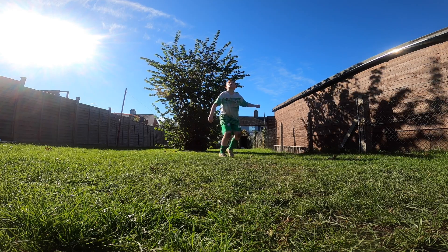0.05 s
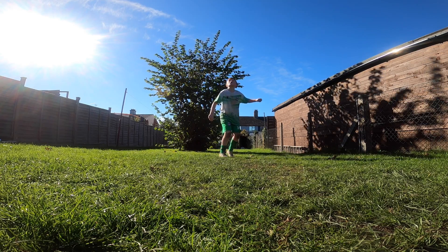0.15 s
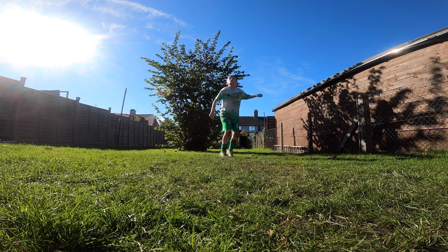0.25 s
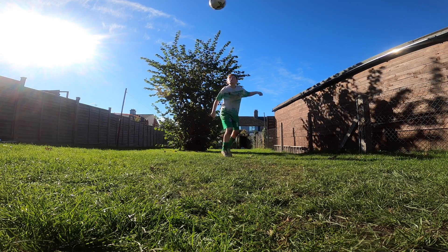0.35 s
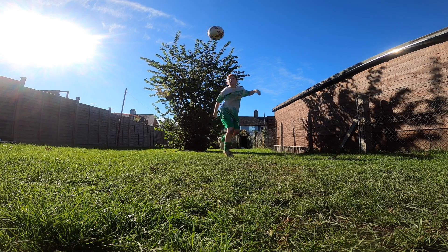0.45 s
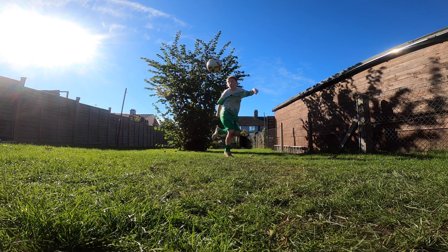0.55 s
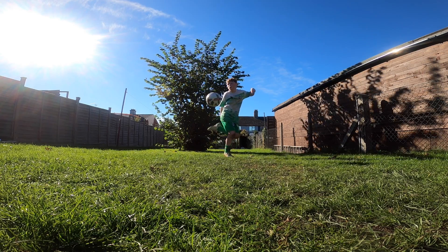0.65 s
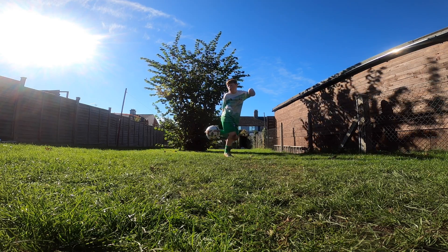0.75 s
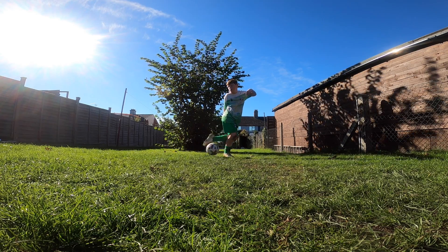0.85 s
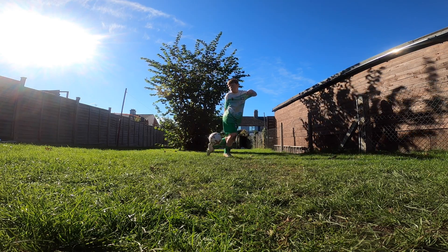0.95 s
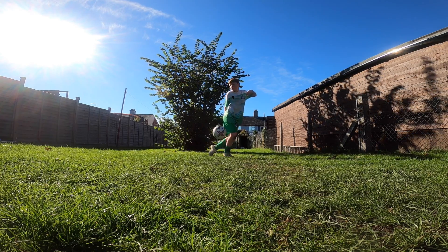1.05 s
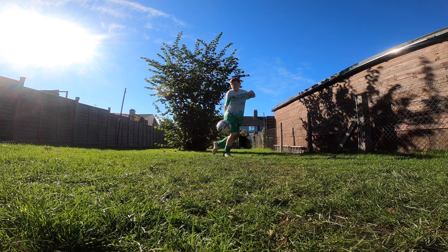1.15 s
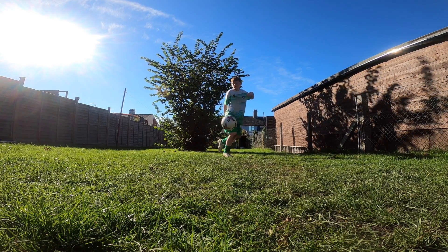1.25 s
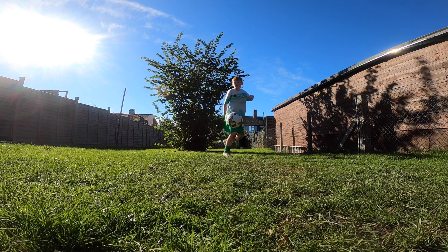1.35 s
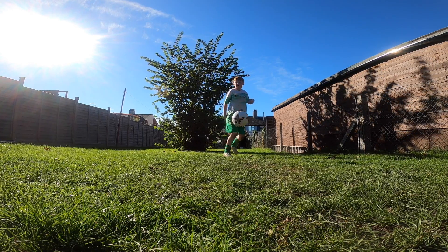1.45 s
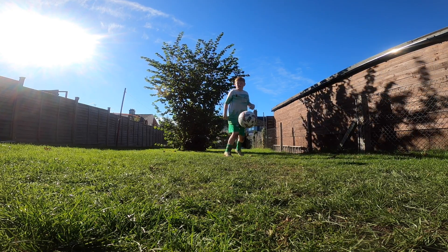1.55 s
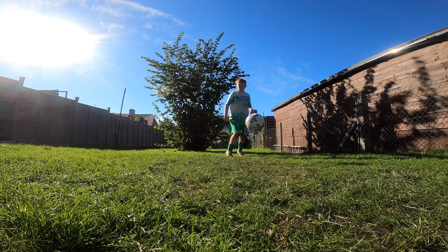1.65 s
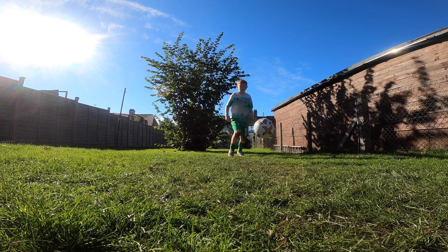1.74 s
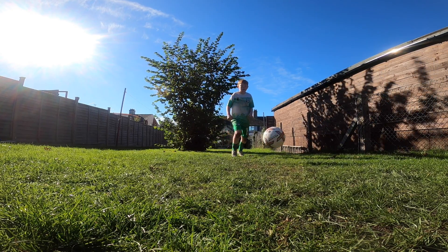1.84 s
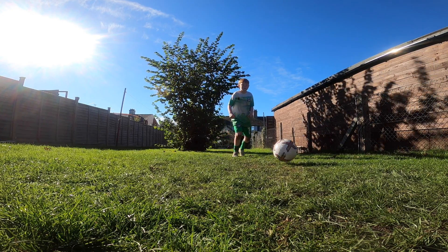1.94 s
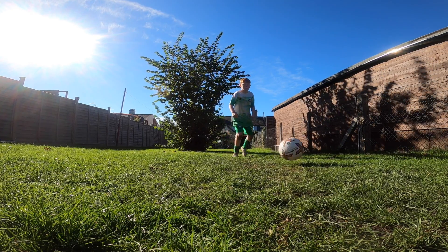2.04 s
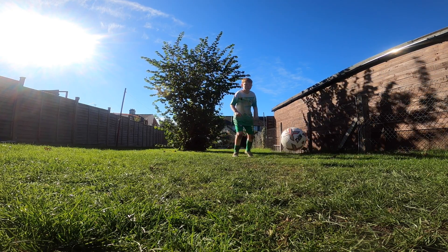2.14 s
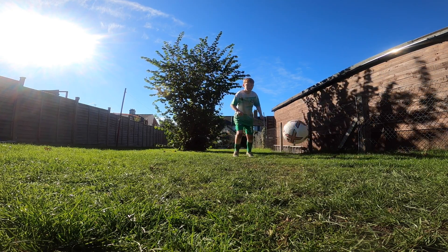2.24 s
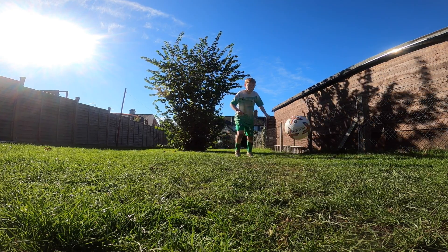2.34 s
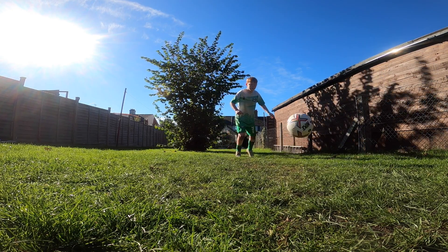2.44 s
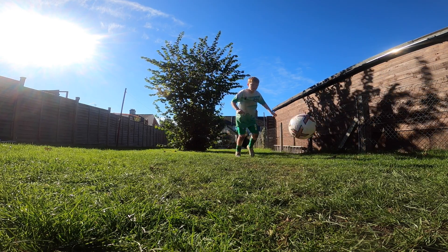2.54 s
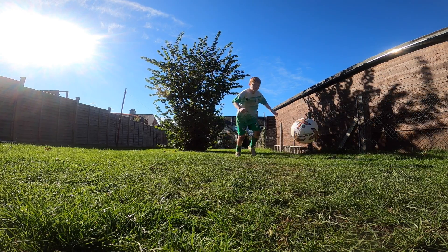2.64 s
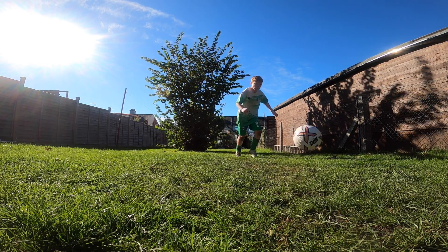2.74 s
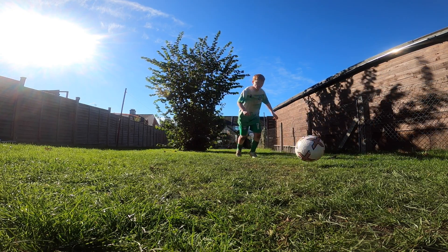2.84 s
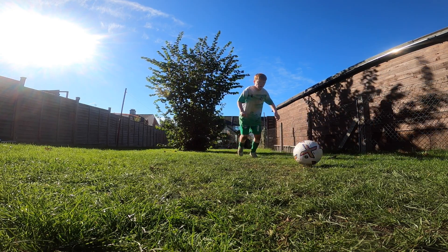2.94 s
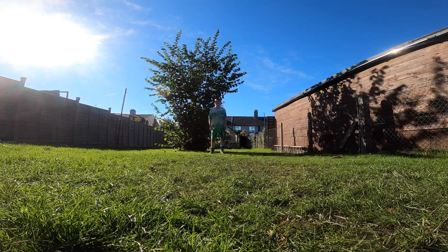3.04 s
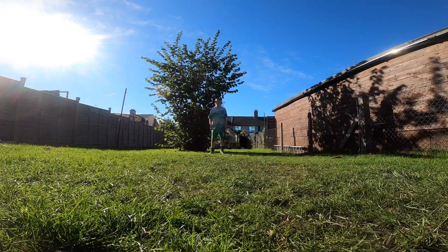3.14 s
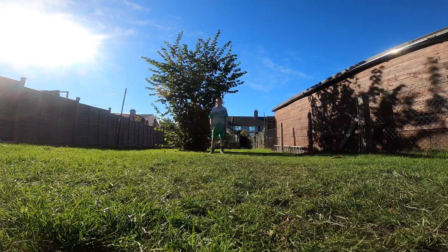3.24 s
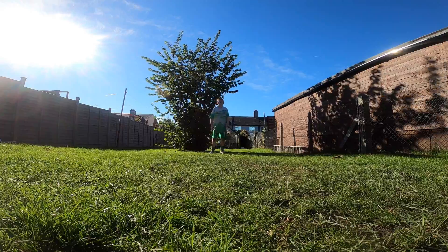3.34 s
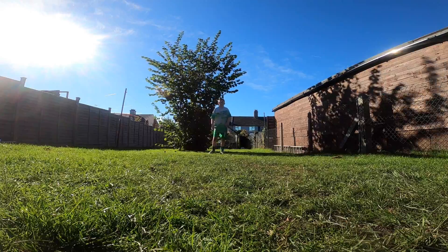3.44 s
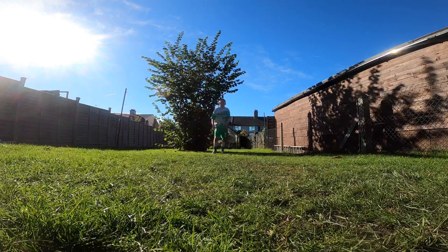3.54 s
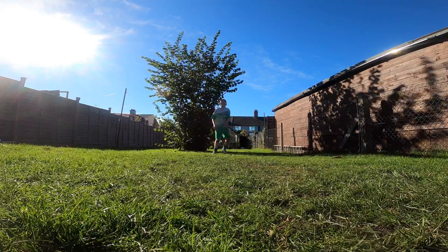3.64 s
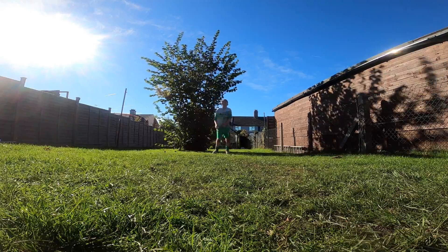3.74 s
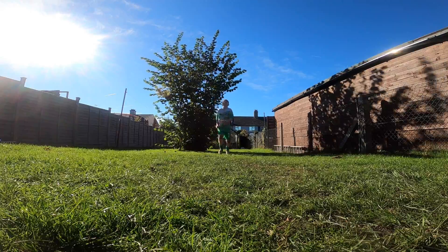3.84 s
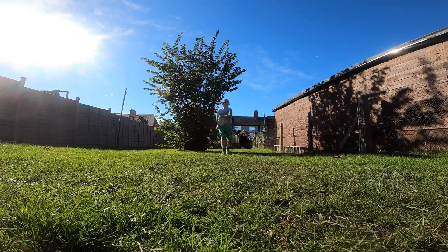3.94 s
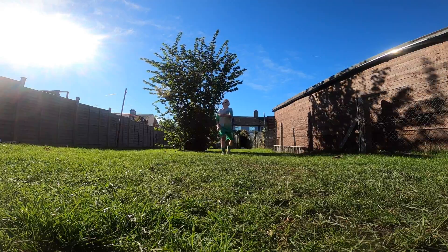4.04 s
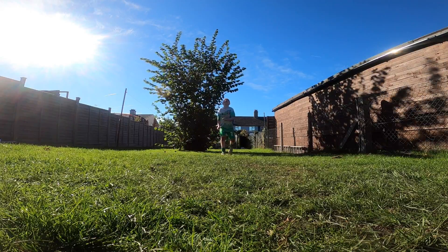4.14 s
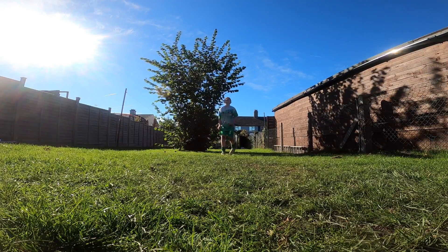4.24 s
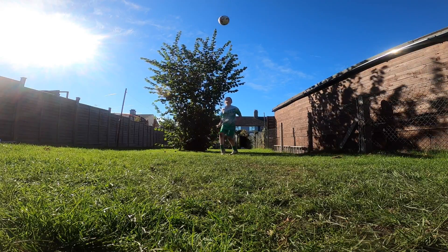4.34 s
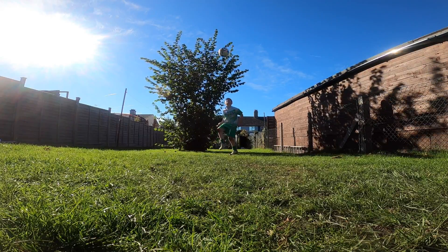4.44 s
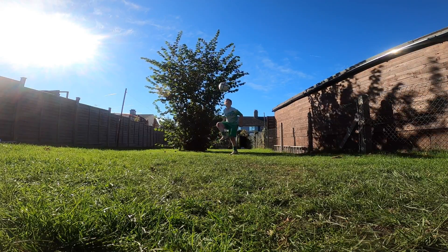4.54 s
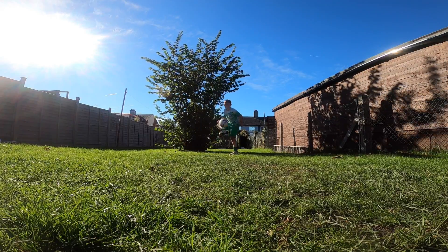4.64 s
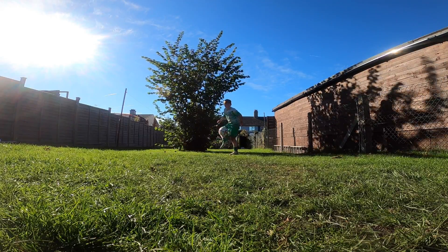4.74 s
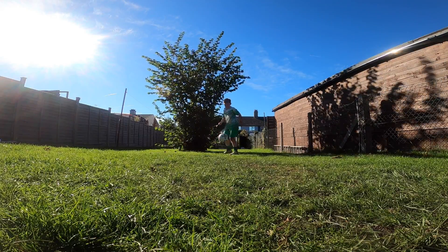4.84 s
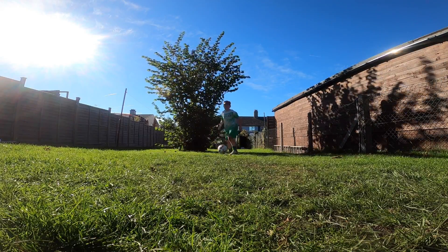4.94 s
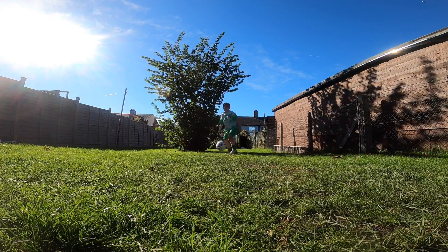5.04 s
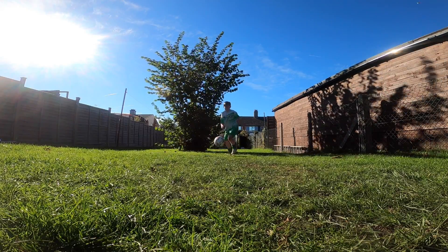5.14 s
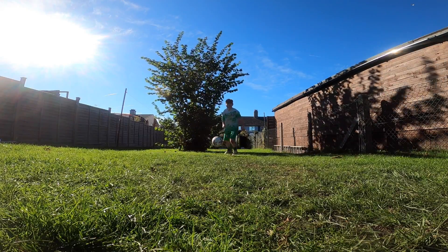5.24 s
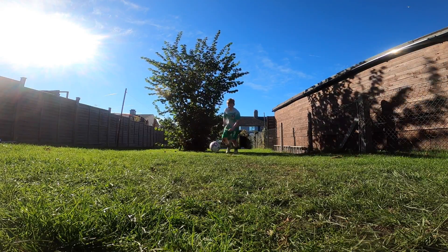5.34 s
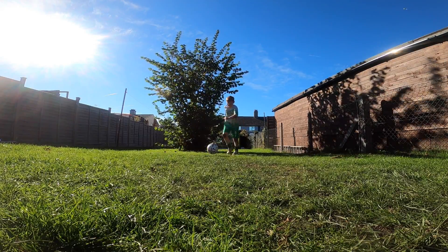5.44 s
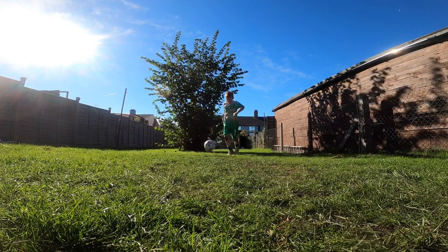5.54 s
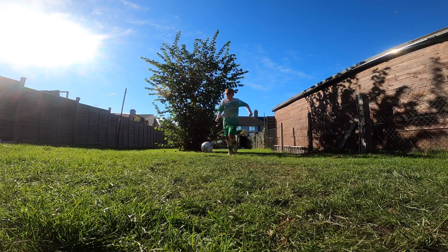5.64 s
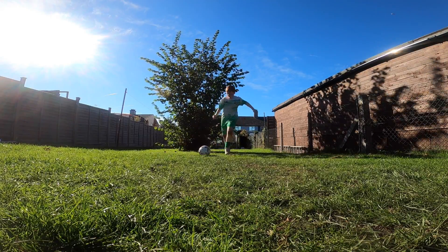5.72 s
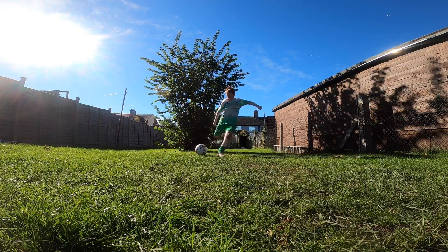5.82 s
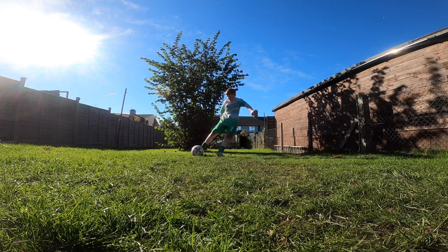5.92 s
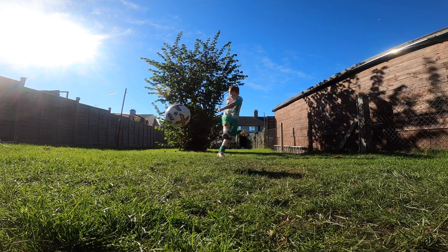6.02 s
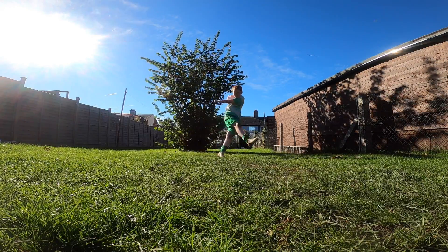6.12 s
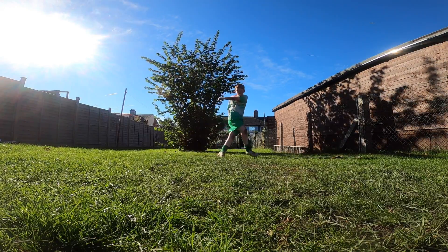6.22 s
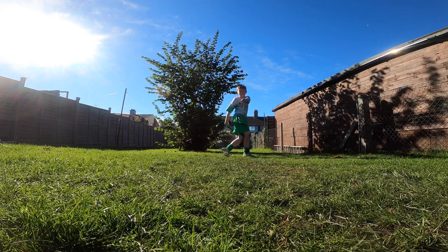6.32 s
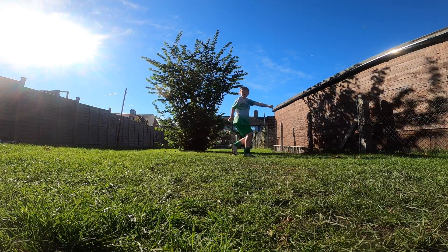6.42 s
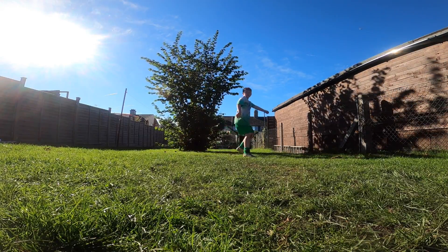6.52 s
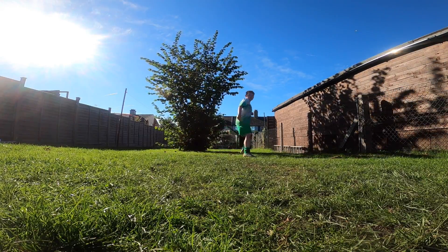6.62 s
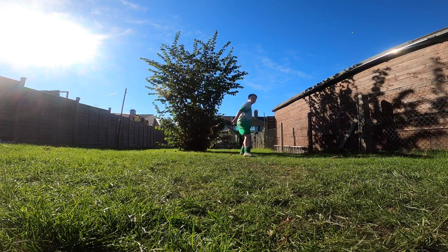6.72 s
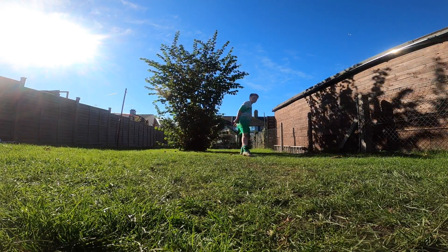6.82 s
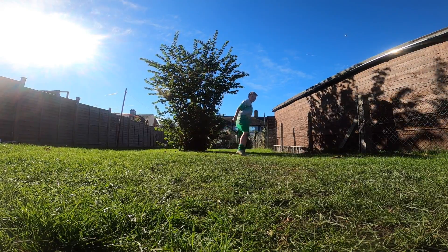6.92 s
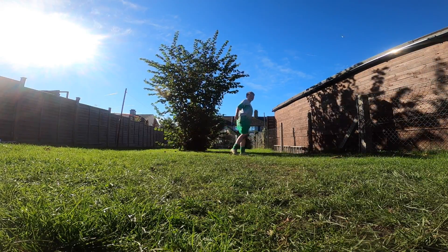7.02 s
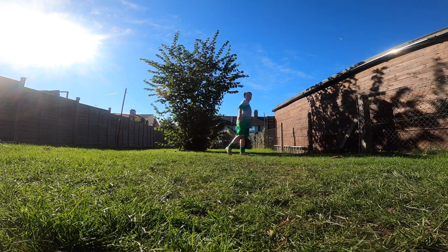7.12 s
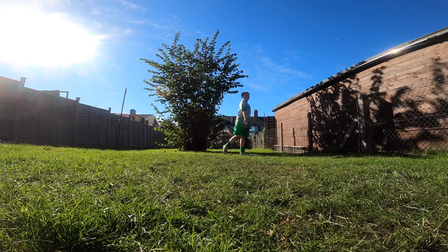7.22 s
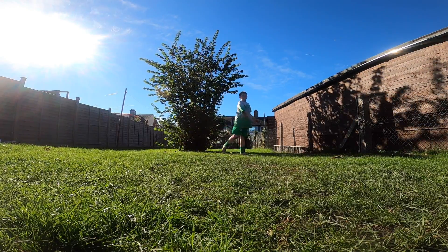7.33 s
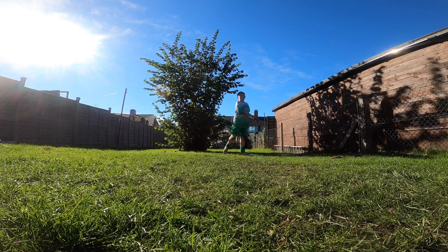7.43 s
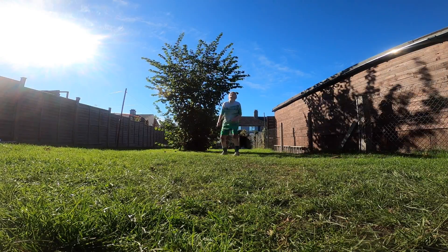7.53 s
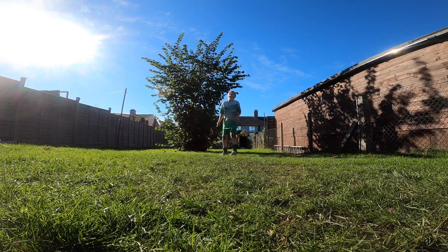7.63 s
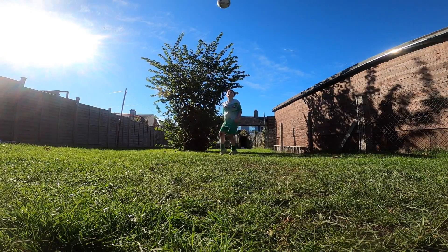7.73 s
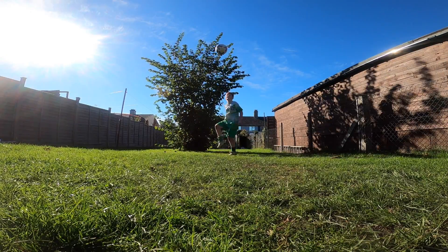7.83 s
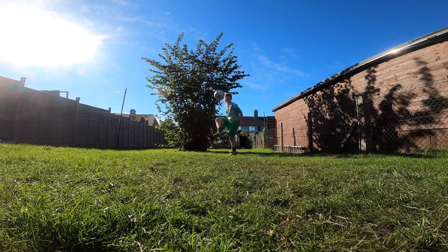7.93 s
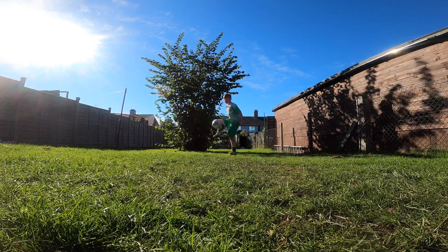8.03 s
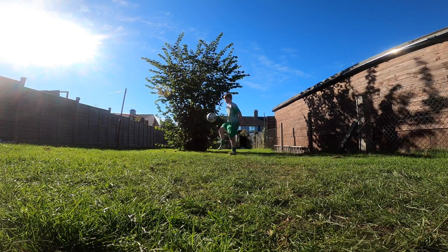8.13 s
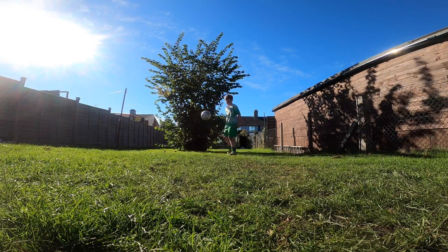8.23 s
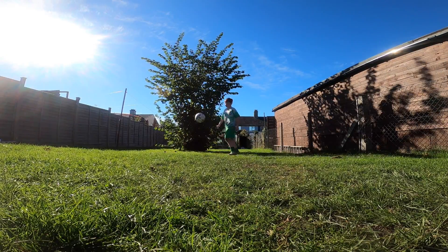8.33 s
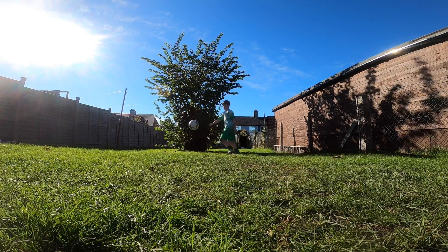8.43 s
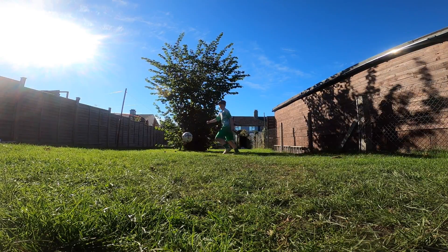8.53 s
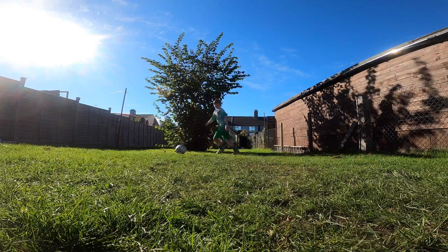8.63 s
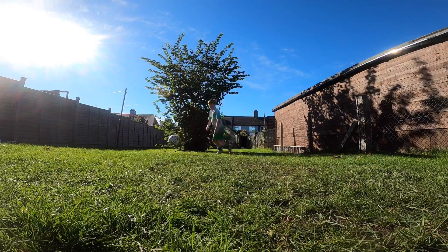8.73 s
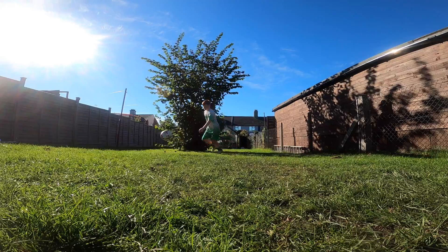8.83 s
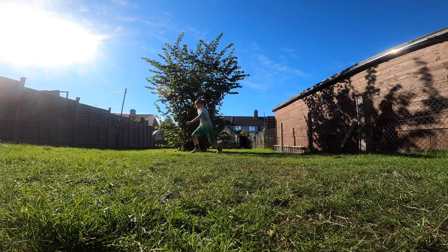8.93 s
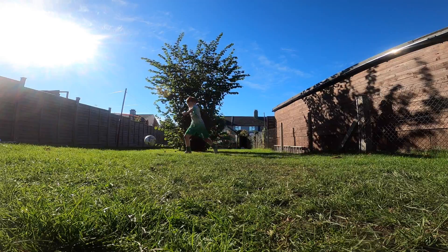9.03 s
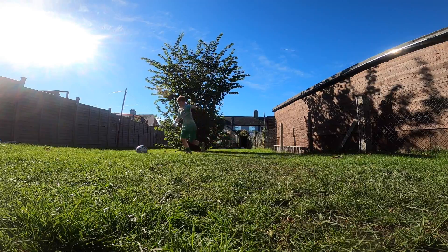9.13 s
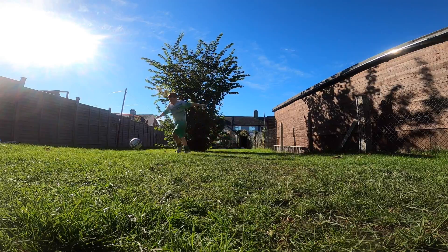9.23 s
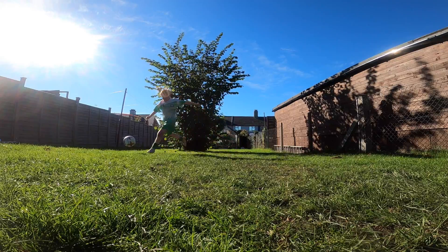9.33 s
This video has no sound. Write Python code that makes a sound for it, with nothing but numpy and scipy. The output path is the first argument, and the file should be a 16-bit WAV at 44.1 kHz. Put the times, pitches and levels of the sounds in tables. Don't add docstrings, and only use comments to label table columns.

```python
import sys
import numpy as np
from scipy import signal
from scipy.fft import rfft, irfft, next_fast_len
from scipy.io import wavfile

SR = 44100
rng = np.random.default_rng(int(sys.argv[2]) if len(sys.argv) > 2 else 0)


def pcm_store(signal):
    levels = np.round(np.clip(np.atleast_2d(signal), -1, 1) * 32767)
    wavfile.write(sys.argv[1], SR, levels.astype(np.int16).T)


def gain_from_decibels(decibels):
    exponent = np.asarray(decibels, float) / 20
    return 10 ** exponent


N = 413216
HALF_SPEED_UNTIL_S = 3.066
REAL_N = N - round(HALF_SPEED_UNTIL_S * SR) // 2


def real_s(s):
    return np.where(s < HALF_SPEED_UNTIL_S, s / 2, s - HALF_SPEED_UNTIL_S / 2)


def slowing(s):
    return np.where(s < HALF_SPEED_UNTIL_S, 2, 1)


def in_time(rows):
    s, *columns = np.transpose(rows)
    return [np.interp(np.arange(REAL_N) / SR, real_s(s), column) for column in columns]


def at_hz(points, hz):
    point_hz, value = np.array(points).T
    return np.interp(np.log(hz), np.log(point_hz), value)


def rms_one(x):
    return x / np.sqrt(np.mean(x ** 2) + 1e-20)


def peak_one(x):
    return x / abs(x).max()


def lowpass(x, hz, order=2):
    return signal.sosfilt(signal.butter(order, hz, fs=SR, output="sos"), x)


def bandpass(x, low, high):
    return signal.sosfilt(signal.butter(2, [low, high], "band", fs=SR, output="sos"), x)


def resonate(x, modes):
    out = 0
    for k, (hz, width, level_db) in enumerate(modes):
        r = np.exp(-np.pi * width / SR)
        poles = [1, -2 * r * np.cos(2 * np.pi * hz / SR), r * r]
        out = out + (-1) ** k * gain_from_decibels(level_db) * signal.lfilter([1 - r * r, 0, r * r - 1], poles, x)
    return out


def tuned(modes, ratio):
    return [(hz * ratio, width, level_db) for hz, width, level_db in modes]


def add(track, s, sound):
    i = int(real_s(s) * SR)
    track[..., i:i + sound.shape[-1]] += sound[..., :REAL_N - i]


def drift(rate):
    r = np.exp(-80 * np.pi * rate / SR)
    slow = signal.lfilter([1], [1, -2 * r, r * r], rng.standard_normal(REAL_N // 40 + 2002))[2000:]
    return np.interp(np.arange(REAL_N) / 40, np.arange(len(slow)), rms_one(slow))


# frequency in Hz, likeness from -1 to 1.
LIKENESS = [(60, 0.76), (150, 0.65), (380, 0.88), (950, 0.71), (2380, 0.46), (5980, -0.17), (15000, 0.23)]


def bands(spectrum, patchy_db, rate, alike=None):
    lowest, highest = spectrum[0][0], min(spectrum[-1][0], 17000)
    edges = lowest * 2 ** np.arange(0, np.log2(highest / lowest), 1 / 3)
    out, together = 0, drift(rate / 2)
    white = rng.standard_normal((2, 2, REAL_N))
    for k, (low, high) in enumerate(zip(edges, edges[1:])):
        mid, side = bandpass(white[k % 2], low, high)
        hz = np.sqrt(low * high)
        c = np.clip(at_hz(LIKENESS, hz) if alike is None else alike, -.95, .99)
        gain = gain_from_decibels(at_hz(spectrum, hz) + patchy_db * (together + drift(rate)))
        out = out + gain * (np.sqrt(1 + c) * mid + np.sqrt(1 - c) * side * [[1], [-1]])
    return rms_one(out)


# time in seconds, traffic level in dB, leaves level in dB.
AIR = [(0.0, -60.5, -65), (0.4, -59, -65), (0.93, -55, -64), (1.73, -62.5, -66.5), (2.1, -59.5, -63),
       (2.5, -55.5, -59), (3.05, -62, -63.5), (3.3, -59.5, -62), (3.89, -60, -62), (4.41, -57, -58),
       (4.9, -60.5, -59.5), (5.2, -61.5, -60), (5.9, -56, -60), (6.8, -63, -63), (7.3, -62, -62.5),
       (7.6, -58.5, -64.5), (8.8, -60, -67), (9.37, -61, -70)]
# frequency in Hz, level in dB per Hz.
TRAFFIC = [(180, -13), (300, -3.5), (542, -12.5), (634, -16), (686, -19.5), (802, -14.5), (1010, -12),
           (1280, -10), (2090, -26), (2400, -27), (3120, -45), (5280, -120)]
# frequency in Hz, level in dB per Hz.
LEAVES = [(1120, -34.5), (1900, -6.5), (2100, -6), (2840, 1), (4160, -1), (5160, -3), (5590, -0.5),
          (7980, -15), (9800, -24), (11100, -27), (13900, -34), (16000, -55)]


def traffic_and_leaves():
    traffic_db, leaves_db = in_time(AIR)
    traffic = gain_from_decibels(traffic_db + 1.5) * bands(TRAFFIC, patchy_db=2.0, rate=9.0)
    return traffic + gain_from_decibels(leaves_db + 2.5) * bands(LEAVES, patchy_db=1.7, rate=5.6)


def crests(s, peak_db, fade):
    since = np.arange(0, REAL_N, 64)[:, None] / SR - real_s(s)
    rise = 1.05 * fade
    power = gain_from_decibels(2 * peak_db) * np.exp(-2 * np.abs(since) / np.where(since < 0, rise, fade))
    return np.interp(np.arange(REAL_N) / 64, np.arange(len(since)), power.sum(axis=1))


# time in seconds, rumble in dB, flutter in dB.
BREEZE = [(0, -53, -53), (1.2, -52.5, -62.5), (1.7, -56, -58), (2.6, -49.5, -55), (3.3, -60, -57.5),
          (4.3, -54.5, -54), (5.2, -40.5, -55), (5.7, -36.5, -43.5), (6.4, -44, -53), (7.2, -54.5, -56),
          (7.8, -51, -52), (8.5, -53, -58.5), (9.37, -47.5, -51)]
# time of the crest in seconds, rumble in dB, flutter in dB, dying time in seconds.
GUSTS = [(0.39, -40.5, -55, 0.15), (0.95, -50, -46.5, 0.1), (1.48, -47.5, -44.5, 0.16),
         (1.937, -43, -53, 0.035), (2.38, -42, -47, 0.21), (3.1, -37.5, -64, 0.028),
         (3.186, -32, -41, 0.084), (3.364, -34.5, -60, 0.073), (3.632, -31, -51.5, 0.11),
         (3.788, -31.5, -64, 0.021), (4.06, -38.5, -50, 0.098), (4.525, -30, -41.5, 0.059),
         (4.709, -32.5, -61, 0.026), (4.871, -26.5, -28, 0.057), (4.969, -20.5, -41, 0.02),
         (5.091, -29, -29, 0.016), (5.2, -31.5, -42.5, 0.2), (5.379, -24.5, -36.5, 0.056),
         (5.526, -36, -52, 0.037), (5.819, -24, -61, 0.015), (5.932, -25.5, -41, 0.024),
         (6.182, -29.5, -34, 0.072), (6.388, -31, -38.5, 0.037), (6.766, -30, -44, 0.024),
         (6.928, -38.5, -47, 0.064), (7.554, -38.5, -62, 0.059), (7.795, -37.5, -52, 0.15),
         (8.352, -37.5, -53, 0.031), (8.866, -41.5, -65, 0.14), (9.024, -34.5, -54.5, 0.022)]
# frequency in Hz, level in dB per Hz.
RUMBLE = [(15, -16), (30, 0.5), (55, -2.5), (85, -8), (130, -25.5), (200, -34.5)]
# frequency in Hz, level in dB per Hz.
FLUTTER = [(50, -34), (90, 5), (150, 1), (250, -15), (400, -48), (700, -49)]


def wind():
    breeze_db, ruffle_db = in_time(BREEZE)
    s, rumble_db, flutter_db, fade = np.transpose(GUSTS)
    fade = fade / slowing(s)
    rumble = np.sqrt(gain_from_decibels(2 * breeze_db) + crests(s, rumble_db, fade))
    flutter = np.sqrt(gain_from_decibels(2 * ruffle_db) + crests(s, flutter_db, fade))
    still_db, pan_db_per_db = -52, 0.2865
    pan_db = pan_db_per_db * (20 * np.log10(rumble) - still_db)
    gust = rumble * bands(RUMBLE, patchy_db=2.0, rate=12, alike=.3)
    gust = gust + flutter * bands(FLUTTER, patchy_db=3.0, rate=25, alike=.5)
    return gust * gain_from_decibels(np.array([pan_db / 2, -pan_db / 2]) + 2.5)


# time of the peak in seconds, peak in dB, brightness in dB.
SCUFFS = [(1.153, -54, 1), (1.711, -42, 5), (1.827, -47, 2), (2.049, -46, 5), (2.459, -42, -3),
          (3.24, -40, 7), (3.358, -43.5, -2), (3.81, -45, 19), (4.049, -37.5, 0), (4.109, -46, 20),
          (5.838, -40.5, 11), (5.93, -32.5, -20), (6.122, -30, 0), (6.245, -45, -3), (6.371, -41.5, -12),
          (6.905, -41.5, 5), (6.995, -41, 9), (8.068, -39, 0), (8.317, -42.5, -1), (8.573, -40, 1),
          (8.837, -48, -3), (9.188, -43.5, 7), (9.359, -39.5, 17)]
# time of the peak in
# seconds, peak in dB, brightness in dB, rise in seconds, fade in seconds.
SWEEPS = [(0.995, -27.5, -6, 0.00093, 0.026), (1.046, -17, 5, 0.0082, 0.0092),
          (2.168, -23.5, 10.5, 0.0029, 0.012), (2.179, -14.5, 8, 0.01, 0.012), (2.27, -58, 16, .02, 0.079),
          (2.6, -39.5, -2, .02, .06), (2.97, -32, 5, .001, 0.0088), (3.61, -46, 19, 0.03, 0.06),
          (5.086, -30, -3, 0.01, 0.0084), (6.043, -19.5, -17, 0.0076, 0.041),
          (6.059, -14, -13, .003, 0.0088), (6.075, -33, 9, .006, 0.048), (6.675, -40, 12, .025, 0.035),
          (6.722, -39.5, 8, .003, 0.083), (6.736, -44, 2, 0.0033, .015), (7.547, -40, 17, .001, 0.0086),
          (7.791, -37.5, 7.5, 0.002, 0.11), (7.816, -29.5, 0, 0.0025, 0.027),
          (8.113, -30.5, 4, 0.0012, 0.015), (8.192, -31.5, -4, 0.002, 0.07),
          (8.514, -40.5, 1, 0.0014, 0.065), (9.331, -45, 21, 0.046, 0.034)]
# frequency in Hz, width in Hz, level in dB.
GRASS = [
    [(1160, 535, 4.5), (2250, 1390, -2.5)],
    [(3640, 1600, -0.5), (6460, 1980, -6), (9350, 2300, -13)],
]
# frequency in Hz, width in Hz, level in dB.
STALKS = [(7600, 3000, 0), (11500, 4500, -4)]


def scuffs():
    out, t = np.zeros(REAL_N), np.arange(SR // 5) / SR
    short_rise_s, short_fade_s = 0.0013, 0.032
    short = [row + (short_rise_s, short_fade_s) for row in SCUFFS]
    for s, peak_db, bright_db, rise, fade in short + SWEEPS:
        grains = rng.standard_normal(len(t)) * gain_from_decibels(2.9 * rng.exponential(1, len(t)))
        body = rms_one(resonate(grains, GRASS[0]))
        hiss = gain_from_decibels(min(bright_db, 15) - 14.5) * rms_one(resonate(grains, GRASS[1]))
        sizzle = gain_from_decibels(-40 + 1.9 * min(bright_db, 22)) * rms_one(resonate(grains, STALKS))
        swell = np.clip(t / max(rise, .0005), 0, 1) ** 2
        dying = np.exp(-np.maximum(t - rise, 0) / np.clip(fade / 2, .001, .05))
        sound = gain_from_decibels(peak_db - 12.0) * (body + hiss + sizzle) * swell * dying
        add(out, s - slowing(s) * rise, sound)
    return out


# start in seconds, peak in dB, frequency as heard in Hz, width in Hz.
KNOCKS = [(1.017, -22.5, 1580, 495), (1.013, -37, 1500, 1500), (1.021, -33, 3000, 2000),
          (1.109, -42, 2300, 1600), (1.0692, -26, 3600, 2000), (1.0692, -25, 2050, 900),
          (1.0745, -27.5, 800, 300), (1.088, -37, 3300, 1500), (1.0695, -49, 6500, 1500),
          (1.069, -23, 850, 500), (2.172, -34, 2700, 1100), (2.182, -29, 935, 397), (2.1705, -29, 760, 440),
          (2.174, -24, 680, 360), (2.1765, -27, 970, 500), (2.186, -26, 780, 400), (2.191, -31, 900, 400),
          (2.201, -33.5, 700, 300), (2.183, -34, 2310, 500), (2.176, -37, 2800, 600),
          (2.272, -49, 560, 120), (2.258, -51, 2600, 400), (2.277, -52, 2550, 400),
          (4.7816, -25, 9600, 800), (4.7816, -22, 8300, 990), (4.7818, -42, 14000, 1200),
          (2.232, -51, 600, 90.6), (2.255, -49, 585, 90), (4.7817, -15, 1600, 450),
          (4.7815, -14, 6180, 950), (6.047, -21, 2680, 530), (8.1235, -7, 4750, 1900),
          (8.1252, -22.5, 6440, 970), (8.1252, -24, 4000, 950), (8.1335, -30, 1300, 550),
          (8.1236, -32, 2130, 500), (6.6262, -30, 3540, 720), (6.6262, -44, 10000, 1200),
          (6.6335, -36, 2560, 500), (6.6325, -46, 5900, 1500), (6.685, -47, 2550, 450),
          (6.73, -51, 5600, 1500), (6.634, -26, 1070, 240), (6.652, -34.5, 1010, 140),
          (6.719, -38, 950, 200), (6.733, -38.5, 960, 200), (6.753, -44, 910, 199),
          (6.842, -45.5, 1030, 200), (8.1236, -18.5, 1240, 260), (7.5465, -50, 5500, 4000),
          (7.791, -46, 2000, 1500), (2.051, -49, 1300, 1200), (9.251, -39.5, 1130, 190),
          (6.6262, -43, 5700, 900), (6.672, -51, 4200, 900), (6.678, -50, 3300, 900),
         (6.1335, -38, 1450, 400), (6.246, -44, 1350, 500), (3.811, -47, 1400, 900),
         (9.186, -50, 1300, 500), (9.3585, -46, 7400, 2000), (6.0515, -40, 4400, 1200),
         (6.0545, -24, 1450, 600), (6.0565, -39, 5600, 2200), (6.062, -44, 7700, 700)]


def knocks():
    out, click = np.zeros(REAL_N), 1. * (np.arange(SR // 20) == 0)
    for s, peak_db, hz, width_hz in KNOCKS:
        hollow = [(hz * slowing(s), width_hz, 0)]
        twice = resonate(resonate(click, hollow), hollow)
        add(out, s, gain_from_decibels(peak_db) * peak_one(twice))
    return out


# start in seconds, level in dB,
# frequency as heard in Hz, cycles it takes to fade, garden echo in dB.
THUMPS = [(1.014, -9.5, 51.7, 1.76, -10.5), (1.055, -14.5, 62.2, 0.7, -30.5),
          (1.068, -4.5, 59.5, 0.53, -10), (1.085, -15, 46.2, 1.1, -29.5), (2.169, -10.5, 43.1, 0.6, -23.5),
          (4.7805, -5, 114, 1.06, -12), (4.957, -10, 77.7, 0.6, -34), (5.078, -18.5, 73.3, 1.34, -43),
          (5.352, -7.5, 83, 0.3, -32), (6.047, -3, 130, 0.89, -12), (6.6258, -11, 121.5, 1.12, -17),
          (6.722, -23, 88, 0.52, -10.5), (7.471, -44, 213, 1.7, 0.5), (8.1227, -9.5, 111.2, 2.05, -14),
          (8.732, -15, 90, 1.28, -17.5), (9.004, -36.5, 58.6, 1.4, -25), (9.25, -22.5, 86.2, 1.3, -19)]


def thumps():
    near, far, t = np.zeros(REAL_N), np.zeros(REAL_N), np.arange(SR // 4) / SR
    for s, level_db, hz, cycles, echo_db in THUMPS:
        turns = hz * slowing(s) * t
        phase = 2 * np.pi * (turns - .13 * (1 - np.exp(-turns / 2.5)))
        swell = (1 - np.exp(-turns / .26)) ** 4 * np.exp(-turns / cycles)
        overtones = np.sin(2.092 * phase + 0.27) + 0.44 * np.sin(3.6 * phase + 2.0)
        overtone_db = -10 - 6 * cycles
        sound = gain_from_decibels(level_db + 7.0) * swell * (gain_from_decibels(overtone_db) * overtones - np.sin(phase))
        add(near, s, sound)
        add(far, s, gain_from_decibels(echo_db) * sound)
    return near, far


# start in seconds, slap
# in dB, # crack against the slap in dB, ring as heard in Hz.
KICKS = [
    (1.0172, -3, -30, 610),
    (1.0692, -14, -14.5, 477),
    (2.1775, -16, -30, 700),
    (4.7814, -10.5, -5.5, 1046),
    (6.0474, -2, -25, 1190),
    (6.6258, -12.5, -23, 975),
    (8.1233, -5.5, -21, 1310),
    (8.734, -26.5, -30, 1180),
    (9.251, -37, -22, 1150),
]
# echo in dB, its crack against the slap in dB.
ECHOES = [(-18, -24), (-10, -11), (-30, -26), (-17, -3.5), (-18, -17), (-15, -10), (-16.5, -6), (-13, -22),
          (-6, -16)]
# frequency in Hz, width in Hz, level in dB.
BALL = [(610, 556, -10), (1288, 240, 2), (1560, 340, -2), (2160, 490, -7)]
# frequency in Hz, width in Hz, level in dB.
CRACK = [(4340, 880, 11), (6510, 1330, 5.5), (7300, 3200, 0.5), (10900, 7600, -37.5)]


def kicks():
    near, far, t = np.zeros(REAL_N), np.zeros(REAL_N), np.arange(SR // 20) / SR
    click = 1. * (t == 0)
    for (s, slap_db, crack_db, ring_hz), (echo_db, far_crack_db) in zip(KICKS, ECHOES):
        contacts = click + .12 * rng.standard_normal(len(t)) * np.exp(-t / .0011)
        ball = tuned(BALL, ring_hz * slowing(s) / BALL[1][0])
        slap = peak_one(resonate(lowpass(contacts, 3200), ball))
        snap = gain_from_decibels(crack_db + 8.5) * peak_one(resonate(contacts, CRACK))
        add(near, s, gain_from_decibels(slap_db - 3.5) * (slap + snap))
        far_slap = peak_one(resonate(click, ball))
        far_snap = gain_from_decibels(far_crack_db + 11.5) * peak_one(resonate(click, GRASS[1]))
        add(far, s, gain_from_decibels(slap_db + echo_db) * (far_slap + far_snap))
    lawn_echo = gain_from_decibels(-5.0) * np.roll(near, round(.00017 * SR))
    return near + lawn_echo, far


def ducking():
    loss_db, from_db, attack_s, release_s = 0, -9.5, 0.037, 0.42
    for s, slap_db, *_ in KICKS:
        since = np.maximum(np.arange(REAL_N) / SR - real_s(s), 0)
        dip = (1 - np.exp(-(since / attack_s) ** 2)) * np.exp(-since / release_s)
        loss_db = loss_db + max(slap_db - from_db, 0) * dip
    return gain_from_decibels(-0.98 * loss_db)


# delay in seconds, level in dB.
WALLS = [(.0095, -11), (0.023, -25), (0.038, -22.5), (.072, -27.5), (0.109, -36)]
# frequency in Hz, seconds to fall by 60 dB.
GARDEN_T60 = [(60, 0.43), (200, 0.58), (1000, 0.16), (4000, 0.47), (12000, 0.37)]


def garden(x):
    t = np.arange(SR // 2) / SR
    tail = np.zeros((2, len(t)))
    for low in 40 * 2. ** np.arange(9):
        fade = gain_from_decibels(-60 * t / at_hz(GARDEN_T60, 1.14 * low))
        mid, side = bandpass(rng.standard_normal((2, len(t))), low, min(2 * low, 18000)) * fade
        tail += mid + .5 * side * [[1], [-1]]
    tail *= gain_from_decibels(-28.5) * np.clip((t - .0015) / 0.005, 0, 1)
    for lag, echo_db in WALLS:
        tail[:, round(lag * SR)] += gain_from_decibels(echo_db - 17.0)
        rough = signal.lfilter([.4], [1, -.6], rng.standard_normal(len(t)))
        tail += gain_from_decibels(echo_db - 1.5) * rough * (t > lag) * np.exp(-np.abs(t - lag) / 0.003)
    return signal.fftconvolve(x[None], tail, axes=1)[:, :REAL_N]


# frequency in Hz, lead of the left port in radians.
PORT_LEAD = [(50, -.1), (500, -.3), (1200, -.5), (2500, -1.1), (5000, -1.1), (8000, -1.3), (14000, -1.7)]


def ports(x):
    size = next_fast_len(REAL_N)
    hz = np.arange(size // 2 + 1) * SR / size + 1
    right_treble_db = 3
    step = .5j * at_hz(PORT_LEAD, hz) - np.log(gain_from_decibels(right_treble_db / 2)) * hz / 12000
    return irfft(rfft(x, size) * np.exp(step * [[1], [-1]]), size)[:, :REAL_N]


# start in seconds, length in seconds, starting pitch in Hz, level in dB, roughness from 0 to 1.
BIRDS = [(3.216, 0.16, 5500, -63, 0.6), (3.23, 0.13, 5940, -71, 0.2), (3.965, 0.2, 4170, -63, .97),
         (4.258, 0.22, 1540, -62, 0.82), (4.56, 0.13, 1280, -66, 0.36), (6.111, 0.125, 3480, -58, 0.25),
         (6.131, 0.097, 2640, -65, 0.14), (6.13, 0.066, 4200, -73, 0.2), (6.172, 0.05, 5050, -74, .3),
         (9.305, 0.041, 4460, -63, 0)]


def birds():
    out = np.zeros((2, REAL_N))
    for s, length, start_hz, level_db, rough in BIRDS:
        t = np.arange(round(length * SR)) / SR
        part = t / length
        waver_s = np.arange(200) * .008 * (1.1 - np.clip(rough, 0, 1))
        waver = np.interp(t, waver_s, rng.standard_normal(200))
        note = np.sin(2 * np.pi * np.cumsum(start_hz - 140 * part ** 2) / SR)
        shape = (1 - rough + rough * waver) * np.sin(np.pi * part) ** 0.5 * gain_from_decibels(-6 * (part - .5))
        add(out, s, gain_from_decibels(level_db + 6) * note * shape * gain_from_decibels([[1.5], [-1.5]]))
    return out


def scene():
    air = traffic_and_leaves()
    grass = scuffs()
    thump, thump_far = thumps()
    slap, slap_far = kicks()
    play = slap + thump + grass + knocks()
    play = play + garden(slap_far + thump_far + gain_from_decibels(-15.5) * grass)
    play = lowpass(play, 9500)
    real = ports(play) + ducking() * air + wind() + birds()
    opening = N - REAL_N
    slowed = signal.resample_poly(real[:, :opening + 100], 2, 1, axis=1)[:, :2 * opening]
    slowed = lowpass(slowed, 5600, order=4)
    return np.concatenate([slowed, real[:, opening:]], axis=1)


def band_limit(x):
    return signal.sosfilt(signal.butter(12, 16340, fs=SR, output="sos"), x)


def record(dry):
    rounded = 1.2 * np.tanh(dry / 1.2)
    x = signal.sosfilt(signal.cheby2(10, 60, 16500, fs=SR, output="sos"), rounded)
    return band_limit(x)


dry = scene()
out = record(dry)
pcm_store(out)
```